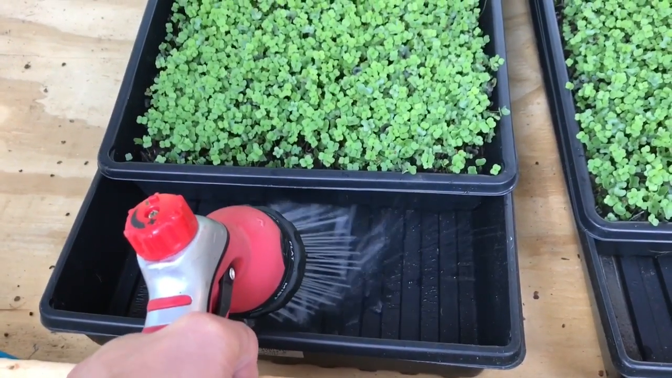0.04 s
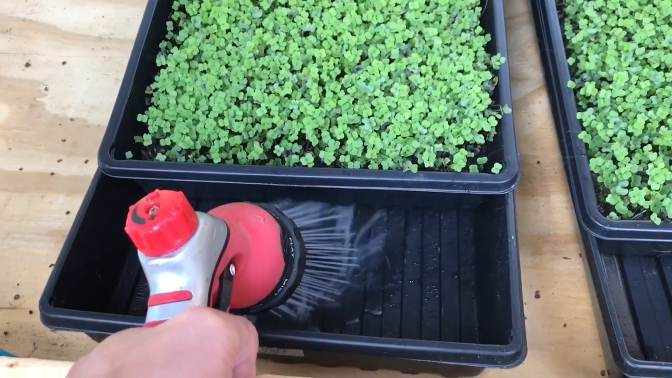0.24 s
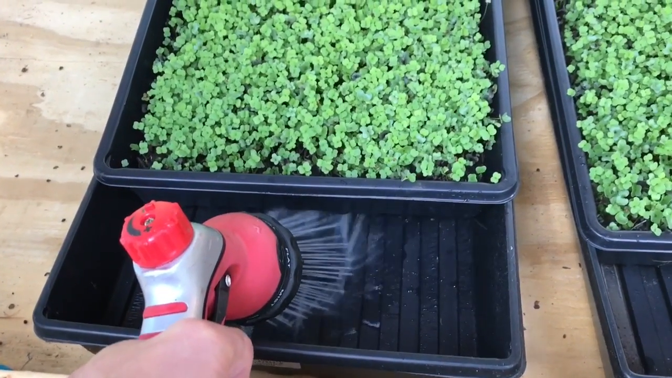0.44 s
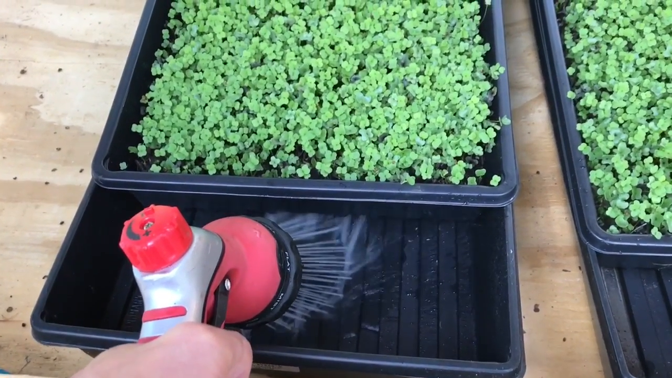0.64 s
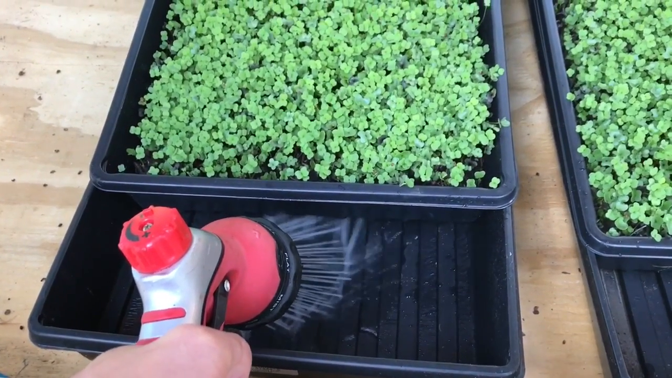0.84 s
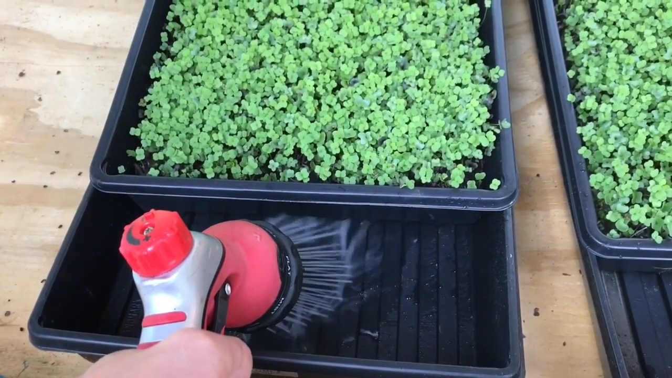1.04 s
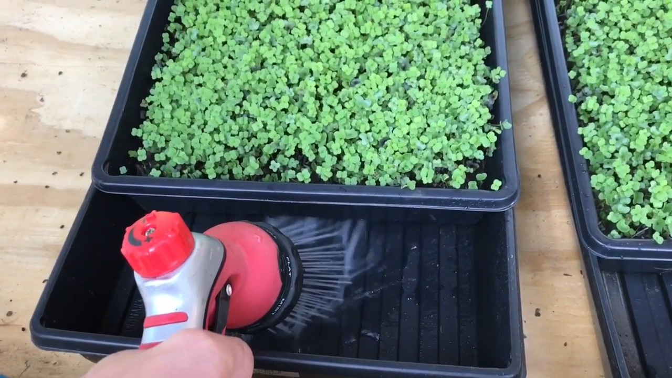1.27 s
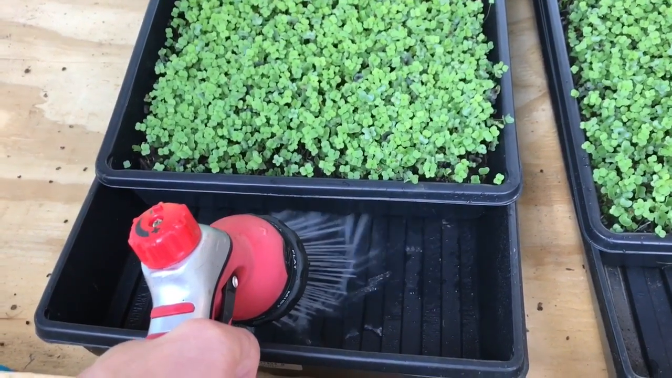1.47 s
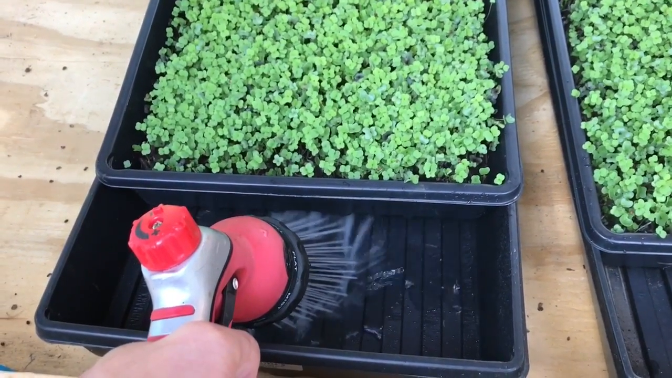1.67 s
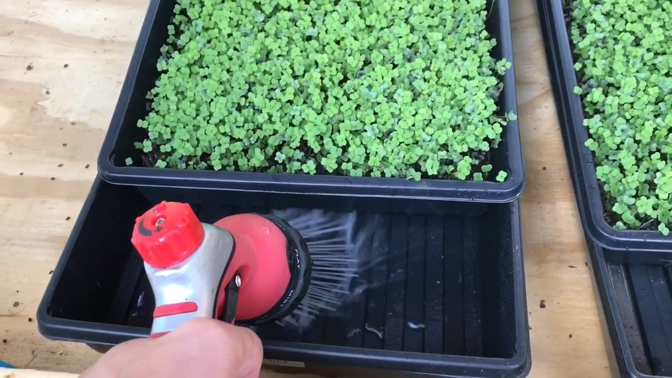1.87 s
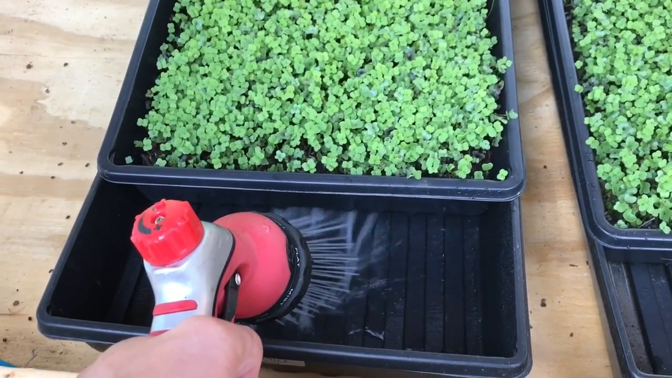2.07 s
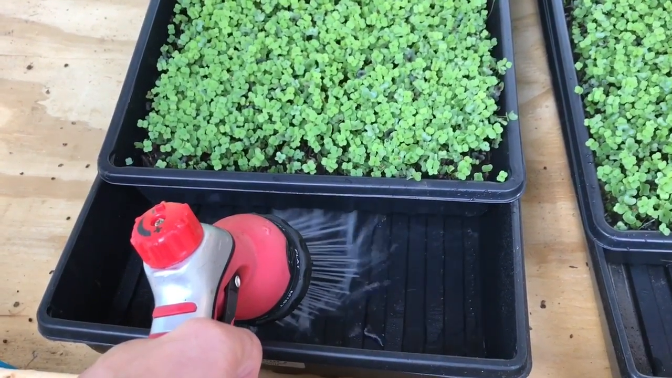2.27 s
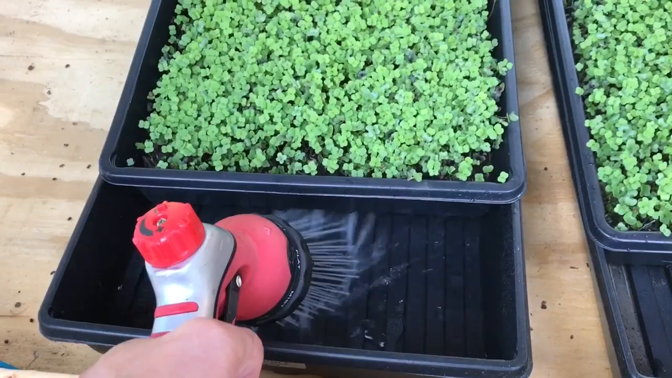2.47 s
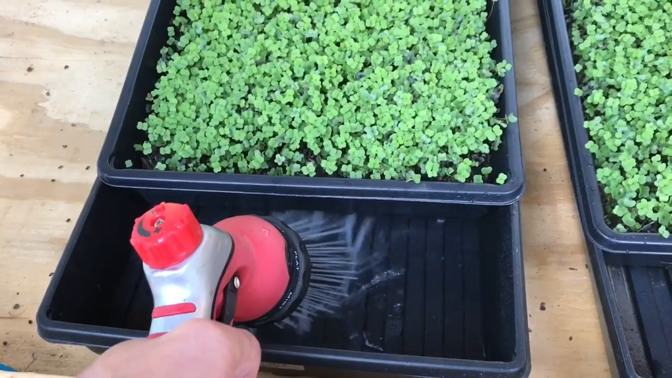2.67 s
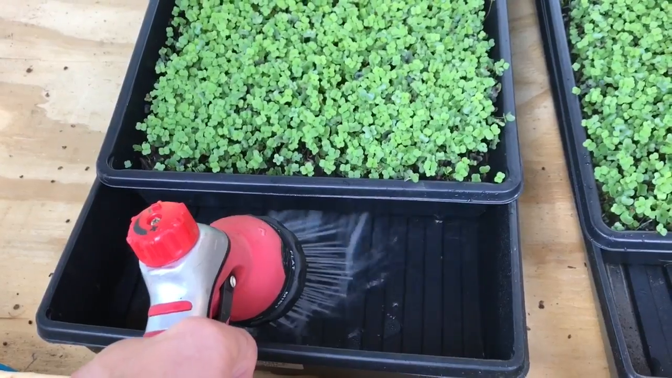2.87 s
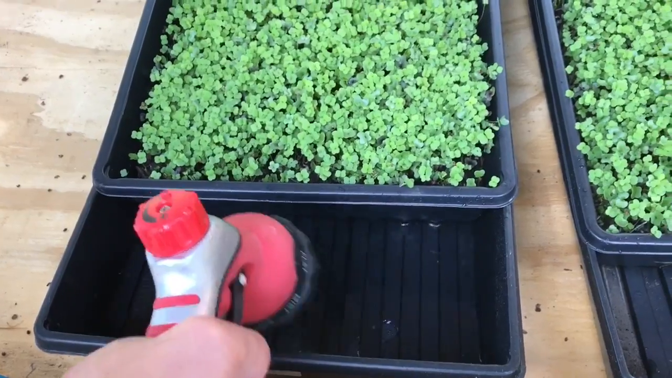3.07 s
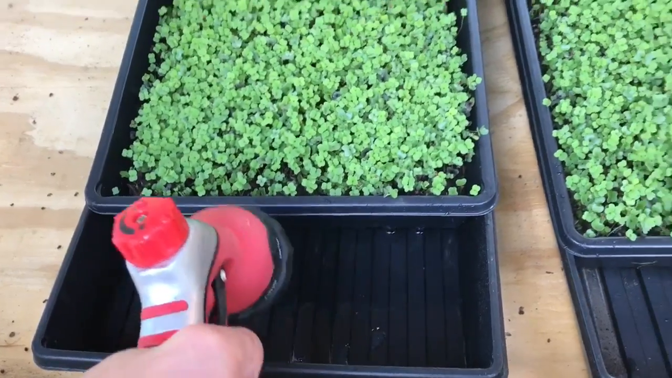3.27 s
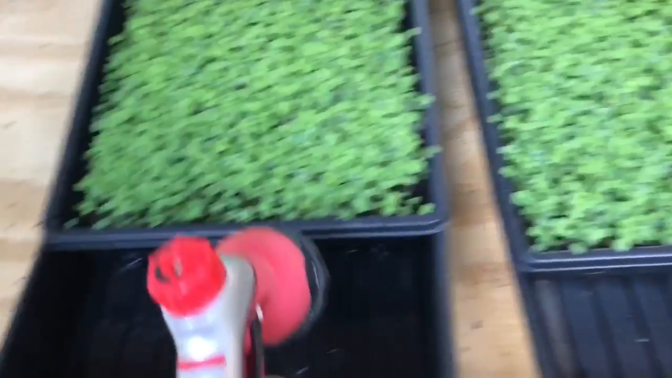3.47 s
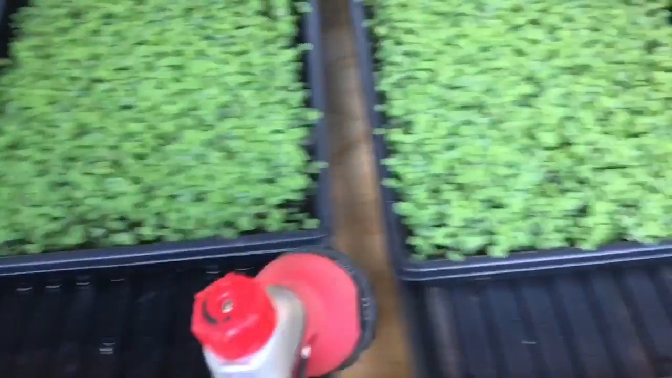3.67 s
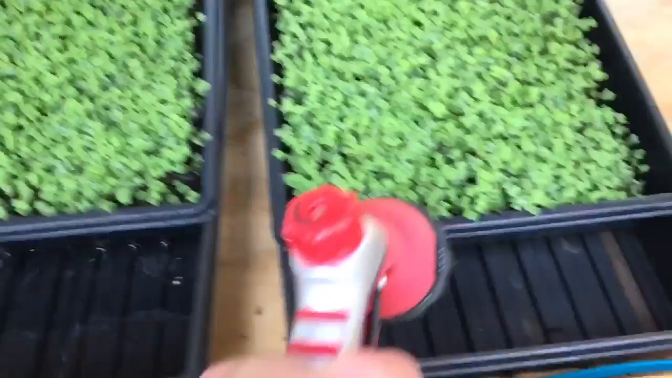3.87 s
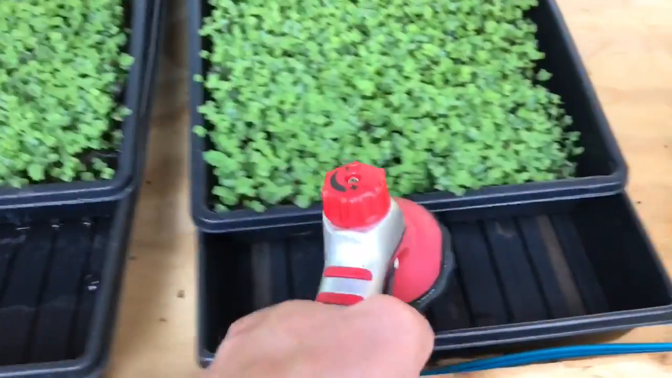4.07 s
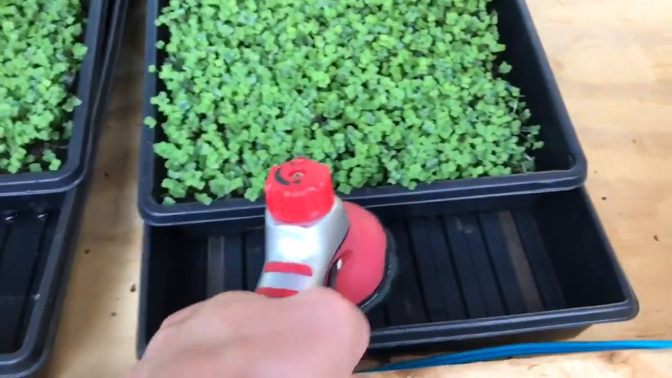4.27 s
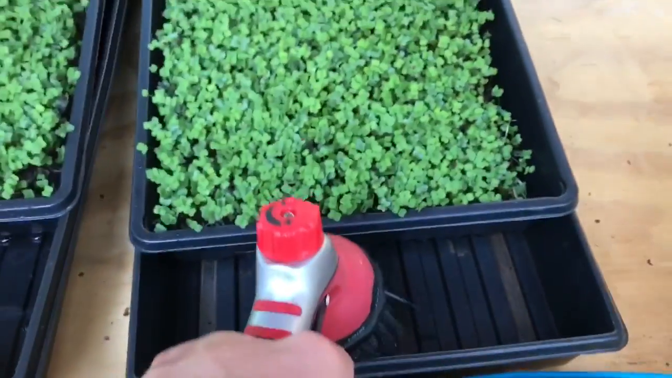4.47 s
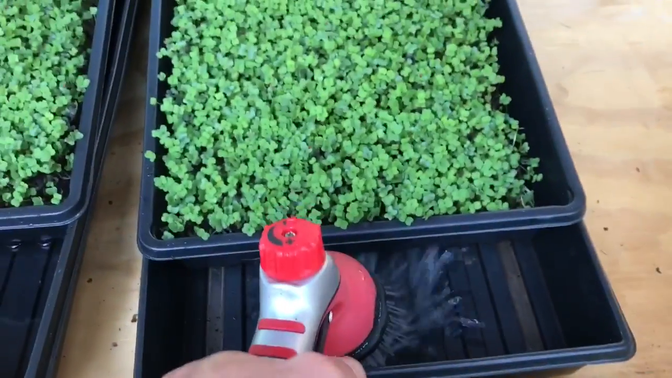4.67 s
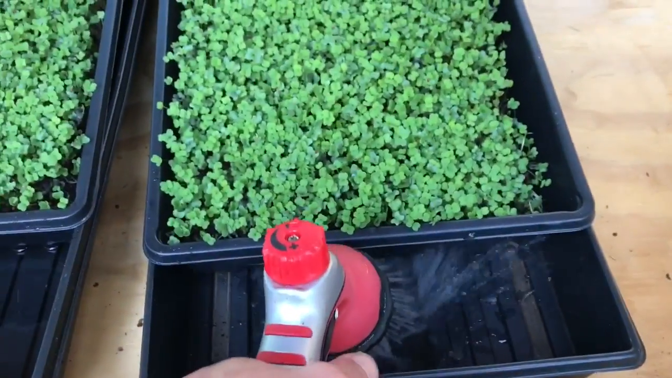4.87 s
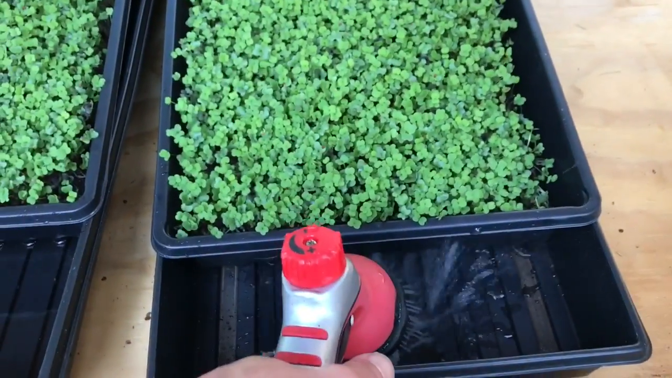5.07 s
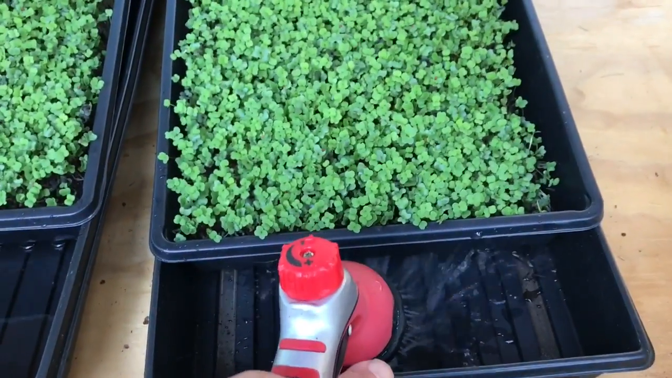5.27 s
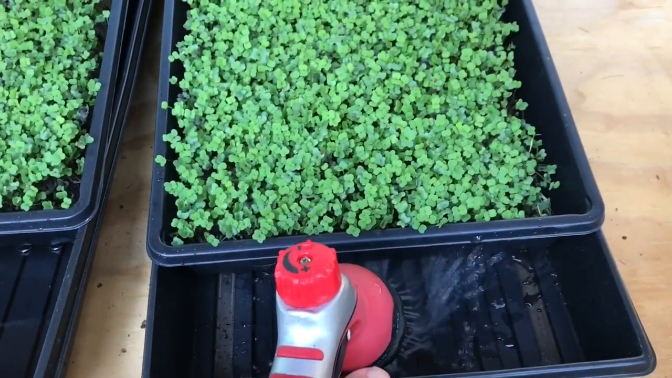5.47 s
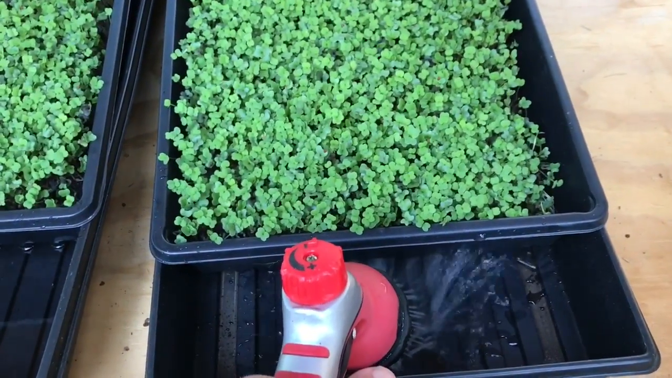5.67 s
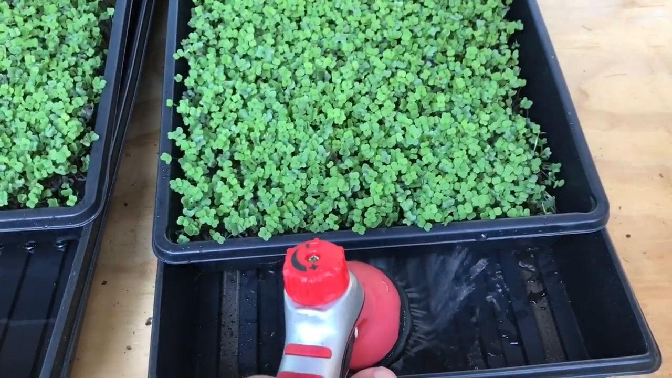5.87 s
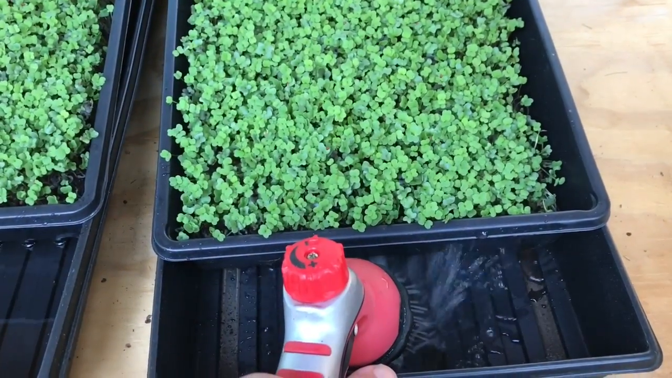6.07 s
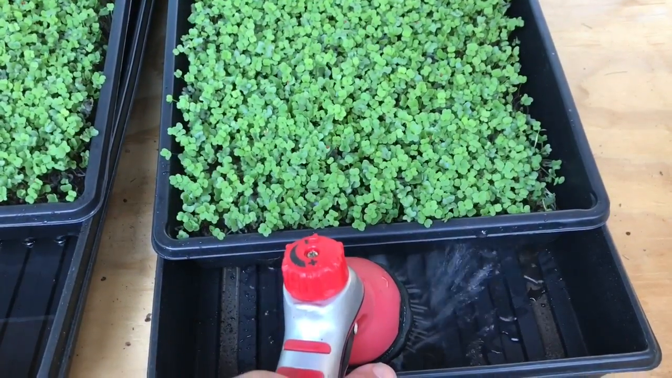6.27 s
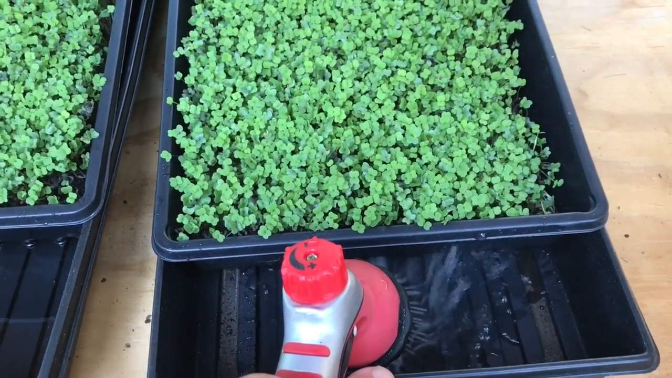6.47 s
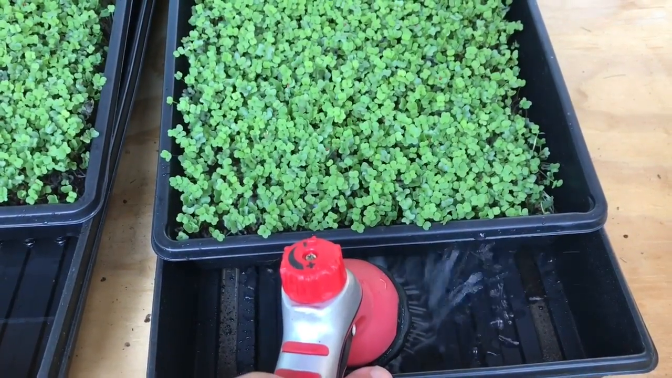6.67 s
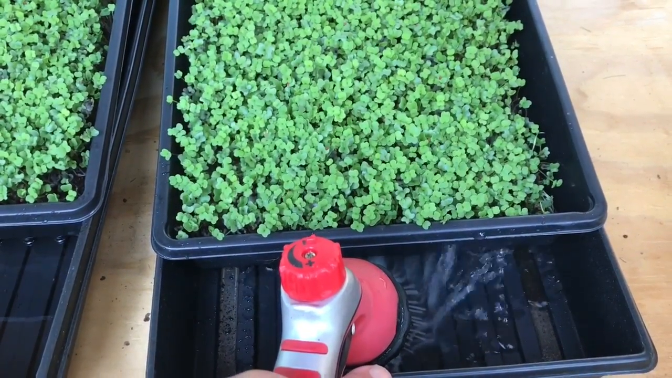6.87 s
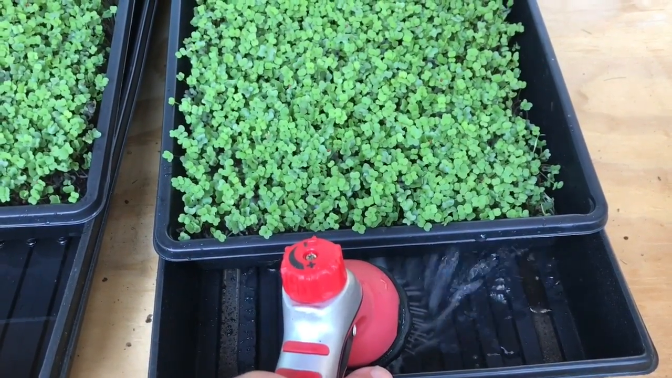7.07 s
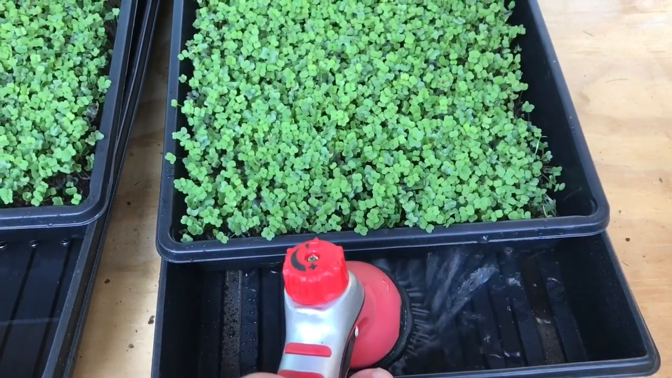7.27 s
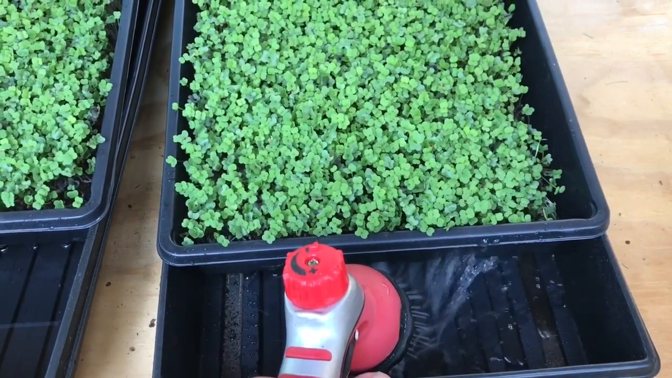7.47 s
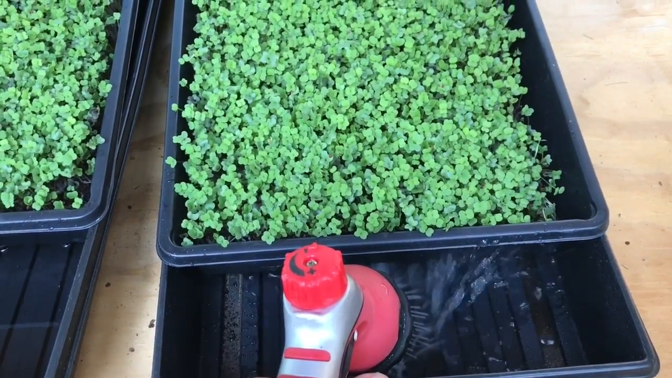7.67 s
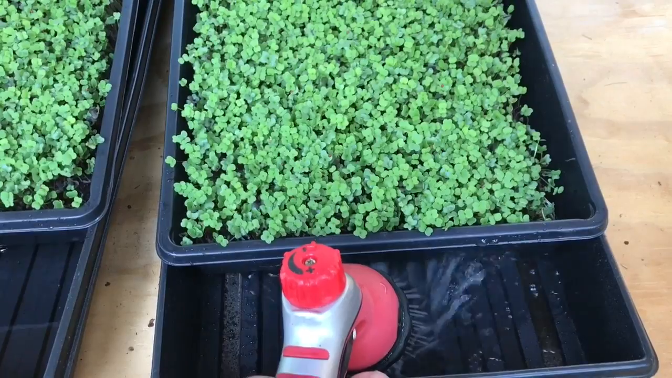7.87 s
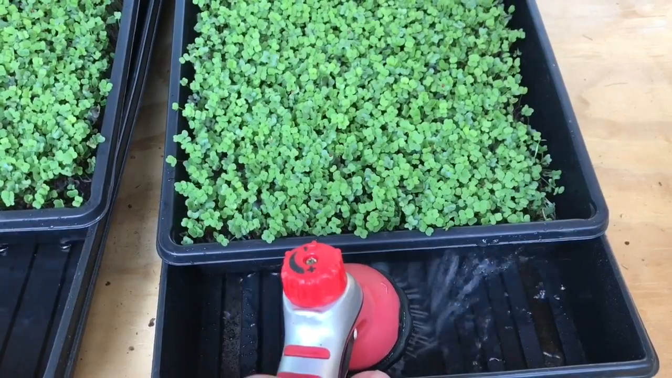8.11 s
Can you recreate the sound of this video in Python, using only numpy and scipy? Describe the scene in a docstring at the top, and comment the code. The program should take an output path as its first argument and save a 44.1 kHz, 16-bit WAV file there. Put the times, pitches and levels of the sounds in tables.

```python
"""Watering two seed trays

A hose nozzle showers an empty plastic seed tray, shuts, is carried to a second tray and opens again.
Thousands of drops a second drum on the thin plastic, splash in the water film and shed a fine fizz.
In the pause the nozzle dribbles and its trigger ticks. A fan hums in the room."""
import sys
import numpy as np
from scipy.fft import rfft, irfft, next_fast_len
from scipy.io import wavfile
from scipy.ndimage import uniform_filter1d, map_coordinates

SR = 44100
rng = np.random.default_rng(int(sys.argv[2]) if len(sys.argv) > 2 else 0)


def wav_record(signal):
    """Record a signal, one row per channel, as 16-bit PCM in the file named by sys.argv[1]."""
    frames = np.transpose(np.atleast_2d(signal))
    bounded = np.clip(frames, -1, 1)
    # unit amplitude maps onto the largest positive 16-bit level
    quanta = np.round(bounded * 32767).astype(np.int16)
    wavfile.write(sys.argv[1], SR, quanta)


N = 358974

# trigger squeeze per tray: open t/s, shut t/s, drum/dB, drum drift/(dB/s), splash/dB, fizz/dB
SQUEEZES = [(-0.6, 3.105, -29, 0.55, -24.5, -29.5), (4.62, 9, -28, -1.05, -26.5, -30)]
# tray floor modes: f/Hz, width/Hz, relative level/dB
FIRST_TRAY_MODES = [(358, 72, -21.5), (715, 130, -18.5), (998, 49, -12), (1103, 51, -7), (1317, 53, 0.5),
                    (1664, 140, -6.5), (1906, 86, -3), (2236, 35, -3), (3060, 96, -9), (4630, 91, -12.5),
                    (8130, 160, -16)]
SECOND_TRAY_MODES = [(397, 170, -19.5), (690, 53, -9), (1038, 120, -4), (1328, 63, 1.5), (1579, 72, -0.5),
                     (1944, 296, -3.5), (2250, 97, 1.5), (2670, 44, -17), (3450, 140, -18),
                     (3950, 360, -9.5), (5530, 270, -9.5), (6420, 110, -7.5), (7220, 170, -8),
                     (9400, 220, -12)]
# spectra of drops bursting on the wet floors: f/Hz, relative level/dB
FIRST_SPLASH_SPECTRUM = [(60, -38), (250, -38), (550, -28.5), (1100, -7.5), (2600, -2.5), (3400, 0.5),
                         (4300, -2.5), (5600, -6.5), (7200, -8), (9400, -7), (12000, -3.5), (15500, -4.5)]
SECOND_SPLASH_SPECTRUM = [(60, -40), (250, -24), (550, -22), (1100, -15), (2600, -2), (3400, 1.5),
                          (4300, -1.3), (5600, -5.5), (7200, -5.5), (9400, -6.5), (12000, -4.5),
                          (15500, -8)]
# bare floor per tray: covered by water t/s, boom/dB, rattle/dB
BARE_FLOORS = [(.28, -48, -34), (4.855, -51.5, -29)]
# fan blade tones: f/Hz, level/dB
FAN_TONES = [(96.9, -57.5), (129.2, -62.5), (161.5, -55), (208, -62), (290.7, -67)]
# fan housing modes: f/Hz, width/Hz, relative level/dB
FAN_HOUSING_MODES = [(453, 18, 2), (680, 60, -5), (1060, 110, -8)]
# spectra of fan air, dribble, fat drops, swing rumble, valve hiss: f/Hz, relative level/dB
FAN_AIR_SPECTRUM = [(20, -46), (35, -19), (58, -5.5), (110, -4), (200, -2), (290, -8.5), (450, -10),
                    (570, -25), (1000, -7), (1350, -18), (2300, -18), (6000, -31), (15000, -44)]
DRIBBLE_SPECTRUM = [(250, -8), (450, 3), (600, -5), (1020, 0), (1400, -4.5), (2900, -7), (5000, -8.5),
                    (9350, -9.5), (15500, -14)]
DROP_SPECTRUM = [(300, -40), (700, -18), (1150, 1), (2750, -1.5), (3980, -3), (4680, -12), (5980, -7),
                 (8870, -18), (12800, -13), (15500, -24)]
SWING_SPECTRUM = [(18, -14), (35, -8), (85, 6), (130, -10), (260, -20), (600, -45)]
VALVE_SPECTRUM = [(800, -40), (1500, -19), (2100, -7), (2700, -12), (3700, -10), (4570, -4), (5300, -13),
                  (9000, -13), (15500, -16)]
# spurts shaken from the carried nozzle: t/s, half length/s, level/dB
SPURTS = [(3.405, 0.059, -42.5), (3.56, 0.081, -51), (3.71, .025, -49), (3.866, .01, -53)]
# last fat drops into the tray: t/s, relative level/dB
LAST_DROPS = [(3.5713, -27), (3.578, -22.5), (3.7284, -39), (3.8651, -39)]
# trigger ticks: t/s, relative level/dB, f/Hz
TRIGGER_TICKS = [(4.053, -49, 10000), (4.1, -50, 13500), (4.1905, -50, 13000), (4.2255, -44, 8600),
                 (4.3675, -52, 11000), (4.481, -52, 11500)]
# hollows of the microphone port and the bench under it: f/Hz, width/Hz, level/dB
PORT_HOLLOWS = [(1210, 60, 0), (4920, 294, -4), (7820, 640, -3), (10400, 430, -6)]

OPENING_S, SHUTTING_S = 0.0099, 0.014
SPEED_UP_S, SLOW_JET_DB = .05, 6  # first water is slow, splashes less
SURGE_DELAY_S, SURGE_WIDTH_S = .235, 0.17  # pressure stored in the shut hose
SURGE_DRUM_DB, SURGE_SPLASH_DB, SURGE_FIZZ_DB = 1.5, 4, 1.5
DRY_DRUM_DB, WETTING_S = 1, 0.27  # dry floor drums louder
DRUM_FLOW_EXPONENT = .68  # weak flow still drums
SPLASH_CUSHION_DB_PER_S, FIZZ_CUSHION_DB_PER_S = 0.44, 0.37  # rising water softens both
COVERING_S, BOOM_LINGERS_S = .035, 0.18
TRICKLE_DB, TRICKLE_FADE_DB_PER_S = -54, 3
EMPTY_AT_S, EMPTYING_S = 4.05, .035
CRACK_AT_S, CRACK_RISE_S, CRACK_HISS_DB = 4.522, 0.0064, -48.5


def amp(db):
    """Decibels to gain."""
    return 10 ** (np.asarray(db) / 20)


def unit(x):
    """Scale to rms 1."""
    return x / np.sqrt(np.mean(x ** 2) + 1e-20)


def rise(at_s, width_s):
    """Smooth step from 0 to 1, half way at at_s."""
    return .5 + .5 * np.tanh((np.arange(N) / SR - at_s) / (2 * width_s))


def swell(at_s, half_s):
    """Bell curve, peak 1."""
    return np.exp(-((np.arange(N) / SR - at_s) / half_s) ** 2)


def wobble(rate_hz):
    """Smooth random curve, rate_hz knots a second."""
    knots = rng.standard_normal(int(N * rate_hz / SR) + 4)
    return map_coordinates(knots, [np.arange(N) * rate_hz / SR])


def filtered(x, response):
    """Apply a complex frequency response."""
    size = next_fast_len(N + SR // 2)
    return irfft(rfft(x, size) * response(np.fft.rfftfreq(size, 1 / SR)), size)[..., :N]


def coloured(x, spectrum):
    """Minimum-phase filter through (f/Hz, level/dB) points."""
    size = next_fast_len(N + SR // 2, real=True)
    hz, db = np.transpose(spectrum)
    gain = amp(np.interp(np.log(np.fft.rfftfreq(size, 1 / SR) + 1), np.log(hz), db))
    cepstrum = irfft(np.log(gain), size)
    cepstrum[1:size // 2] *= 2
    cepstrum[size // 2 + 1:] = 0
    return irfft(rfft(x, size) * np.exp(rfft(cepstrum)), size)[:N]


def ringing(x, modes):
    """Parallel resonators (f/Hz, width/Hz, level/dB), alternating in sign."""
    def response(f):
        return sum((-1) ** k * amp(db) * 1j * f * width / (hz * hz - f * f + 1j * f * width)
                   for k, (hz, width, db) in enumerate(modes))
    return filtered(x, response)


def impacts(per_s, spread_db=3):
    """Drops of random size at random times, rms 1."""
    lands = rng.random(N) < per_s / SR
    return unit(lands * amp(spread_db * rng.standard_normal(N)) * rng.choice([-1, 1], N))


def flow(opens_s, shuts_s):
    """Share of full flow through the valve."""
    return rise(opens_s, OPENING_S) * (1 - rise(shuts_s, SHUTTING_S))


def jet_gains(opens_s, shuts_s, drum_db, drift_db_per_s, splash_db, fizz_db):
    """Drum, splash and fizz follow the flow: a surge, then slow drift as the tray fills."""
    filling_s = np.maximum(np.arange(N) / SR - opens_s, 0)
    surge = swell(opens_s + SURGE_DELAY_S, SURGE_WIDTH_S)
    water = flow(opens_s, shuts_s)
    fast_water = water * amp(-SLOW_JET_DB * np.exp(-filling_s / SPEED_UP_S))
    dry_db = DRY_DRUM_DB * np.exp(-filling_s / WETTING_S)
    drum = amp(drum_db + dry_db + SURGE_DRUM_DB * surge + drift_db_per_s * filling_s)
    splash = amp(splash_db + SURGE_SPLASH_DB * surge - SPLASH_CUSHION_DB_PER_S * filling_s)
    fizz = amp(fizz_db + SURGE_FIZZ_DB * surge - FIZZ_CUSHION_DB_PER_S * filling_s)
    return water ** DRUM_FLOW_EXPONENT * drum, fast_water * splash, fast_water * fizz


def spray(squeeze, tray_modes, splash_spectrum, crossover_hz=9500):
    """Jets break into drops that ring the tray, splash and shed fizzing droplets."""
    drum_gain, splash_gain, fizz_gain = jet_gains(*squeeze)
    lowpass = lambda hz: 1 / np.sqrt(1 + (hz / crossover_hz) ** 8)
    highpass = lambda hz: np.sqrt(1 - lowpass(hz) ** 2)
    flutter = amp(0.26 * wobble(14) + 0.34 * wobble(90))  # uneven jet break-up
    drops = impacts(per_s=16000, spread_db=4) * flutter
    drum = unit(ringing(drops, tray_modes)) * amp(0.71 * wobble(11))  # sloshing loads the floor
    bursting = coloured(impacts(per_s=18000) * flutter, splash_spectrum)
    splash = unit(filtered(bursting, lowpass))
    droplets = coloured(impacts(per_s=14000, spread_db=4.5), splash_spectrum)
    fizz = unit(filtered(droplets, highpass)) * amp(0.3 * wobble(25))
    return drum_gain * drum + splash_gain * splash + fizz_gain * fizz


def bare_floor(opens_s, shuts_s, covered_s, boom_db, rattle_db):
    """Nearly dry plastic booms and rattles until water covers it."""
    jets = flow(opens_s, shuts_s)
    boom_gain = amp(boom_db) * jets * (1 - rise(covered_s + BOOM_LINGERS_S, COVERING_S))
    fast_jets = jets * rise(opens_s + SPEED_UP_S, .02)  # only these hit hard enough to rattle
    rattle_gain = amp(rattle_db) * fast_jets * (1 - rise(covered_s, COVERING_S))
    boom_mode, rattle_mode = [(350, 140, 0)], [(3080, 1700, 0)]
    drops = impacts(per_s=12000, spread_db=6)
    boom = unit(ringing(ringing(drops, boom_mode), boom_mode))
    rattle = unit(ringing(ringing(drops, rattle_mode), rattle_mode))
    return boom_gain * boom + rattle_gain * rattle


def tray_walls(x, echo_db=-20, sway_s=.00004):
    """Weak wall echoes; their paths drift as the hand sways."""
    echoes = sum(map_coordinates(x, [np.arange(N) - SR * (delay_s + sway_s * wobble(1.18))])
                 for delay_s in np.geomspace(.0007, .0034, num=4))
    return x + amp(echo_db) * echoes


def fan(whir_db=-58, air_db=-52):
    """Slightly unsteady blade tones, a whirring housing and a soft rush of air."""
    t = np.arange(N) / SR
    hum = sum(amp(db + wobble(5.8)) * np.sin(2 * np.pi * hz * t + 0.35 * wobble(6))
              for hz, db in FAN_TONES)
    whir = unit(ringing(rng.standard_normal(N), FAN_HOUSING_MODES))
    air = unit(coloured(rng.standard_normal(N), FAN_AIR_SPECTRUM))
    return hum + amp(whir_db) * whir + amp(air_db) * air


def dribble(spatter_t60_s=.025):
    """The shut nozzle head empties: a fading patter, spurts and a few fat drops."""
    shuts_s = SQUEEZES[0][1]
    since_shut_s = np.arange(N) / SR - shuts_s
    draining = rise(shuts_s, SHUTTING_S) * (1 - rise(EMPTY_AT_S, EMPTYING_S))
    trickle = amp(TRICKLE_DB - TRICKLE_FADE_DB_PER_S * since_shut_s) * draining
    spurt_power = sum((amp(db) * swell(at_s, half_s)) ** 2 for at_s, half_s, db in SPURTS)
    patter = unit(coloured(impacts(per_s=11000), DRIBBLE_SPECTRUM))
    t = np.arange(SR // 20) / SR
    slaps = np.zeros(N)
    for at_s, db in LAST_DROPS:
        spatter = 0.083 * rng.standard_normal(len(t)) * amp(-60 * t / spatter_t60_s)
        slaps[round(at_s * SR):][:len(t)] += amp(db) * ((t == 0) + spatter)
    return np.sqrt(trickle ** 2 + spurt_power) * patter + amp(17.5) * coloured(slaps, DROP_SPECTRUM)


def swing(at_s=3.7, half_s=.4, level_db=-56.5):
    """Soft handling rumble as the hose swings to the second tray."""
    rumble = unit(coloured(rng.standard_normal(N), SWING_SPECTRUM))
    return amp(level_db) * swell(at_s, half_s) * rumble


def trigger(t60_s=.035):
    """The plastic trigger ticks under the hand."""
    t = np.arange(SR // 20) / SR
    ticks = np.zeros(N)
    for at_s, db, hz in TRIGGER_TICKS:
        grain = unit(uniform_filter1d(rng.standard_normal(len(t)), size=12))
        envelope = amp(db - 12 - 60 * t / t60_s)
        ticks[round(at_s * SR):][:len(t)] += envelope * grain * np.sin(2 * np.pi * hz * t)
    return ticks


def valve(whistle_hz=4640, whistle_db=-46):
    """Water squeezes through as the valve cracks open: a hiss and a brief whistle."""
    barely_open = rise(CRACK_AT_S, CRACK_RISE_S) * (1 - rise(SQUEEZES[1][0], OPENING_S))
    hiss = barely_open * unit(coloured(rng.standard_normal(N), VALVE_SPECTRUM))
    whistle = swell(4.538, 0.0097) * unit(ringing(rng.standard_normal(N), [(whistle_hz, 120, 0)]))
    return amp(CRACK_HISS_DB) * hiss + amp(whistle_db) * whistle


def scene():
    """All sources close and centred."""
    first = spray(SQUEEZES[0], FIRST_TRAY_MODES, FIRST_SPLASH_SPECTRUM)
    second = spray(SQUEEZES[1], SECOND_TRAY_MODES, SECOND_SPLASH_SPECTRUM)
    bare = sum(bare_floor(*squeeze[:2], *floor) for squeeze, floor in zip(SQUEEZES, BARE_FLOORS))
    mid = tray_walls(first + second + bare) + fan() + dribble() + swing() + trigger() + valve()
    return np.array([mid, mid])


def record(dry, top_hz=15750):
    """Port and bench hollows notch the treble; a steep low-pass ends the band."""
    def response(f):
        port_db = sum(db / (1 + (2 * (f - hz) / width) ** 2) for hz, width, db in PORT_HOLLOWS)
        return amp(port_db) / np.sqrt(1 + (f / top_hz) ** 600)
    return filtered(dry, response)


dry = scene()
out = record(dry)
wav_record(out)
```